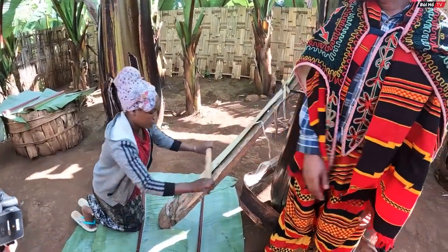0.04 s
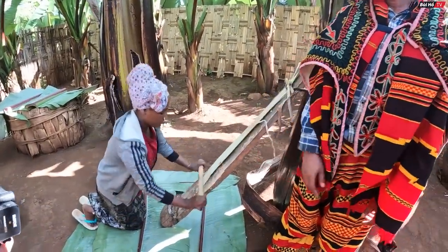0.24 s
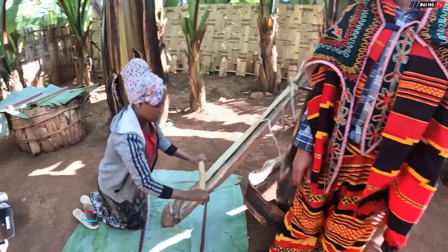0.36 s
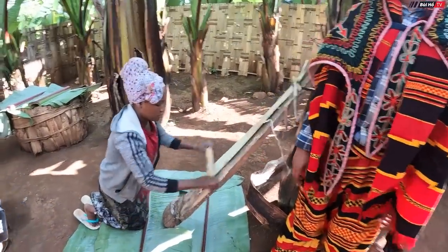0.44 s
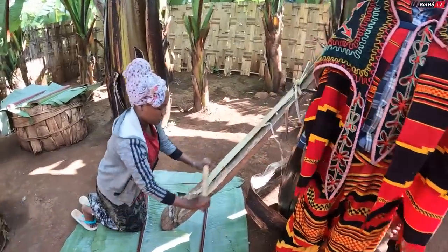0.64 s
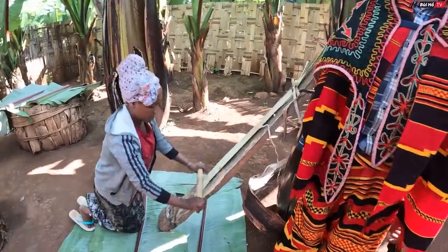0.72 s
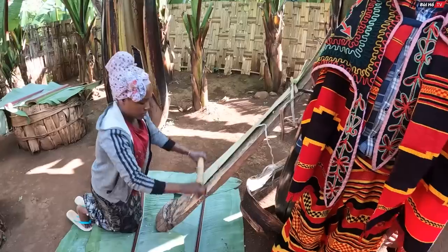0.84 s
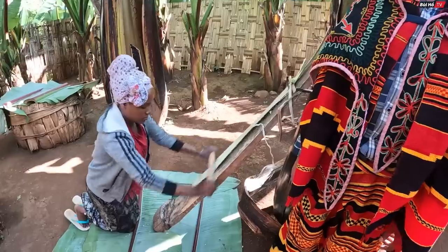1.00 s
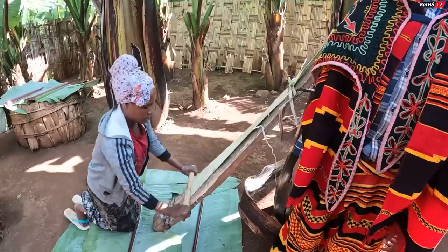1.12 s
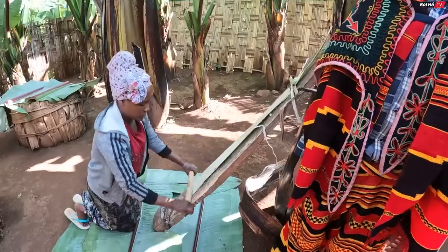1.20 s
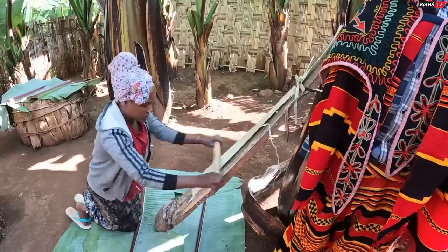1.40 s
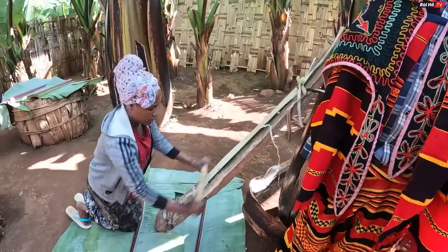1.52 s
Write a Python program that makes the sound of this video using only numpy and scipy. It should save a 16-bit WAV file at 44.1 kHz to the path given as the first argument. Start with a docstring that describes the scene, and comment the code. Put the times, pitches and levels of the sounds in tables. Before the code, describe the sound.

A bamboo blade scrapes a plant stem on a wooden board in three close, even strokes, with soft knocks and pulp rustling between them. Outdoors, wind bumps the microphone, and a distant rooster and small bird are faintly heard.

```python
"""Outdoors, a yard hums faintly, wind bumps the microphone and a far rooster holds the end of its crow. Right
at the start a cricket chirps, and pulp and leaves rustle. Then a bamboo blade scrapes pulp off a plant stem on
a wooden board: thousands of tiny fibre tears make a rasp and ring the blade and board. The cricket chirps
again, and two more strokes follow. Along the way pulp ticks, the blade rings briefly, the board knocks softly,
and pulp and leaves rustle between the strokes and after the last one."""
import sys
import numpy as np
from scipy import signal
from scipy.fft import rfft, irfft
from scipy.io import wavfile

SR = 44100
rng = np.random.default_rng(int(sys.argv[2]) if len(sys.argv) > 2 else 0)


def generate_wav(signal):
    """Clip the signal to [-1, 1] and save it as 16-bit WAV at the path in sys.argv[1]."""
    frames = np.transpose(np.atleast_2d(signal))
    scaled = np.clip(frames, -1, 1) * 32767
    pcm = np.round(scaled).astype(np.int16)
    wavfile.write(sys.argv[1], SR, pcm)


N = 68355
TIME = np.arange(N) / SR  # in seconds
FREQS = np.fft.rfftfreq(N, 1 / SR) + 1  # in Hz; the + 1 avoids the log of zero

# The tone of the yard's hum. Each row: frequency in Hz, relative level in dB.
YARD_SPECTRUM = [(100, -18), (170, -6.5), (240, -10.5), (330, -18), (600, -25.5), (1000, -21), (1500, -18),
                 (2200, -29), (5700, -28.5), (9000, -39), (12500, -45), (15500, -83)]
# The rise and fall of the wind. Each row: time in seconds, level in dB.
WIND_LEVELS = [(0, -47.5), (.17, -46), (.4, -48), (.64, -43.5), (.9, -51.5), (1.15, -56.5), (1.26, -48),
               (1.55, -52)]
# The tone of the wind's rumble. Each row: frequency in Hz, relative level in dB.
WIND_SPECTRUM = [(12, 9), (30, 0), (50, -16), (70, -14), (90, -50)]
# The rooster's note. Each row: time in seconds, pitch in Hz, level of the second harmonic in dB.
CROW_NOTE = [(0, 822, -72), (.55, 764, -64), (.6, 760, -74), (.645, 756, -64), (.9, 713, -64),
             (1.01, 704, -62), (1.1, 691, -70), (1.45, 664, -69), (1.49, 660, -63), (1.55, 656, -72)]
# The cricket's chirps. Each row: middle in seconds, half length in seconds, pitch in Hz, level in dB.
CRICKET_CHIRPS = [(0.006, 0.015, 5810, -61.5), (0.65, 0.035, 5920, -72)]
# Rustles of pulp and leaves. Each row: start in seconds, length in seconds, level in dB,
# centre in Hz, width to each side in octaves.
LEAF_RUSTLES = [(0.013, 0.039, -60.5, 4700, 1.4), (0.087, 0.01, -59.5, 3700, 1.7),
                (0.381, 0.013, -48.5, 3140, 0.89), (0.473, 0.051, -47.5, 1450, 2.3),
                (0.538, 0.04, -55, 1520, 1.5), (0.901, 0.072, -54.5, 3320, 1.75),
                (1.495, 0.04, -58, 1380, 1.2)]
# Single gusts. Each row: middle in seconds, peak level in dB, half length of the push in seconds.
GUSTS = [(0.207, -34.5, 0.0073), (0.275, -22.5, 0.0052), (0.319, -39, 0.0052), (0.798, -36, 0.0053)]
# The blade's strokes, one list each. Each row: time in seconds, level of the bright rasp in dB,
# then the low rasp, the blade's ring and the board's body, each in dB above that level.
STROKES = [
    [(.217, -54, -10, -12, -22), (.234, -43, -8, -7, -13), (.242, -29.5, -12, -5, -17.5),
     (.27, -26, -14, 5.5, -13.5), (.292, -27, -3, -15, -10.5), (.312, -28, -4.5, -6.5, -10),
     (.35, -35.5, -2, -7, -7), (.364, -46.5, -1, -1.5, -6), (.475, -67, -12, -13, -7)],
    [(.672, -67, -21, -10, -1), (.68, -47.5, -12, -11, -46), (.69, -37.5, -1, 0, -14),
     (.708, -31, -16, 0, -18), (.717, -26.5, -7.5, -4, -14.5), (.76, -28.5, -4, 4, -10),
     (.79, -31, -0.5, 0.5, -6), (.825, -40, -10.5, -2, -7.5), (.868, -60, 4.5, 0, -7),
     (.92, -65, -14, 3, -23)],
    [(1.108, -68, -18, -18, -31), (1.122, -34.5, -11.5, -3.5, -18), (1.148, -31.5, -9.5, -7, -12),
     (1.17, -28.5, -8.5, 1.5, -8.5), (1.206, -28, -3, 8, -6.5), (1.225, -29.5, -10, -2.5, -6.5),
     (1.255, -29.5, -4, -2.5, -10), (1.288, -47.5, -4, 2, 0), (1.34, -56, -5, 0.5, 0),
     (1.378, -53.5, -4, -14, 3.5), (1.39, -45, -20, 1, -26), (1.404, -62.5, -3, -5, 1),
     (1.46, -68, -5, 3, 1)],
]
# The tone of tearing fibres. Each row: frequency in Hz, relative level in dB.
RASP_SPECTRUM = [(1500, 1), (2500, 2.5), (3200, 5), (4000, 2.5), (5000, 2.5), (6500, -4.5), (8400, -12),
                 (10200, -12), (13000, -21), (15900, -46)]
# The tone of the wooden board. Each row: frequency in Hz, relative level in dB.
BOARD_SPECTRUM = [(110, -15), (221, -5), (471, -13), (567, -6.5), (732, -10.5), (973, -3), (1150, -1.5),
                  (1500, -37)]
# The ring of taut fibres. Each row: time in seconds, pitch in Hz, level in dB above the bright rasp.
FIBRE_GLIDE = [(.24, 3630, -11), (.3, 3427, -3), (.35, 2779, -9), (.69, 3920, -6.5), (.735, 3348, -3.5),
               (.755, 2687, -3), (.8, 2600, -4), (1.12, 4248, 3), (1.145, 4000, -5), (1.16, 3120, -1),
               (1.27, 2797, -19)]
# The blade's resonances. Each row: frequency in Hz, width in Hz, relative level in dB.
BLADE_RESONANCES = [(1278, 63, 7.5), (1399, 82, 10.5), (1684, 33, -0.5)]
# Snaps and ticks of pulp, and one brief ring of the blade (the row at 0.305 s). Each row: start in seconds,
# peak level in dB, centre in Hz, width in Hz.
TICK_SOUNDS = [(0.305, -22, 1670, 108), (0.471, -51, 10500, 3000), (0.539, -46, 1570, 300),
               (0.5565, -42, 2240, 900), (0.5583, -42.5, 5950, 5000), (0.563, -45.5, 1190, 300),
               (0.652, -52, 4160, 976), (0.9035, -52, 9500, 5000), (0.948, -58, 10500, 4000),
               (1.0707, -41.5, 5500, 2518), (1.2132, -10, 1250, 1000), (1.319, -46.5, 11000, 2500),
               (1.4375, -51, 12000, 2520), (1.449, -46, 2500, 2000), (1.4994, -43, 1850, 1200),
               (1.5116, -37.5, 1358, 700)]
# Soft knocks on the board. Each row: start in seconds, level in dB, pitch in Hz.
BOARD_KNOCKS = [(0.481, -47, 212), (0.691, -47, 190), (0.958, -44, 205), (0.999, -44.5, 210),
                (1.203, -34, 230), (1.252, -33, 246), (1.267, -35.5, 277)]
# How alike left and right are for close sounds. Each row: frequency in Hz, likeness from 0 to 1.
STEREO_LIKENESS = [(300, .93), (1300, .97), (2500, .88), (8000, .82), (13000, .25)]
# How much louder the left side is. Each row: frequency in Hz, left minus right in dB.
LEFT_LOUDER = [(60, -3), (1650, 1), (4970, 2.5), (15000, 4.5)]
# How far the left side runs ahead. Each row: frequency in Hz, phase in radians (negative is behind).
LEFT_AHEAD = [(2000, -.4), (8000, -.5)]


def amp(db):
    """Turns decibels into a factor to multiply by."""
    return 10 ** (np.asarray(db) / 20)


def rms_one(x):
    """Scales a sound to an average (rms) level of 1."""
    return x / np.sqrt(np.mean(x ** 2) + 1e-20)


def in_time(rows):
    """Joins a table's rows with straight lines in time, giving one curve for each later column."""
    times, *columns = np.transpose(rows)
    return [np.interp(TIME, times, column) for column in columns]


def over_frequency(rows):
    """Joins a table's rows with straight lines on a log frequency axis."""
    hz, values = np.transpose(rows)
    return np.interp(np.log(FREQS), np.log(hz), values)


def drift(hz):
    """A slow random wobble of size 1, moving mostly slower than hz."""
    r = np.exp(-2 * np.pi * hz / SR)
    wobble = signal.lfilter([1], [1, -2 * r, r * r], rng.standard_normal(N + 8000))
    return rms_one(wobble[8000:])  # skip the filter's settling


def colour(x, spectrum):
    """Gives a sound the tone of a spectrum, silent beyond its ends, at level 1."""
    inside = (FREQS > spectrum[0][0]) & (FREQS < spectrum[-1][0])
    return rms_one(irfft(rfft(x) * amp(over_frequency(spectrum)) * inside, N))


def resonate(x, hz, width_hz):
    """One resonance: the narrower it is, the longer it rings."""
    r = np.exp(-np.pi * width_hz / SR)
    return signal.lfilter([1 - r * r, 0, r * r - 1], [1, -2 * r * np.cos(2 * np.pi * hz / SR), r * r], x)


def stereo_noise(spectrum, likeness):
    """Noise that left and right partly share."""
    mid, side = colour(rng.standard_normal((2, N)), spectrum)
    return mid + np.sqrt((1 - likeness) / (1 + likeness)) * side * [[1], [-1]]


def yard():
    """The yard's faint hum is steady noise, strongest in the lows."""
    return amp(-60.5) * stereo_noise(YARD_SPECTRUM, likeness=0.54)


def wind():
    """Wind on the microphone makes a deep rumble that swells and sinks."""
    level_db, = in_time(WIND_LEVELS)
    return amp(level_db) * stereo_noise(WIND_SPECTRUM, likeness=0.4)


def rooster():
    """One long, wavering note sags in pitch. It is strongest in its second harmonic."""
    hz, db = in_time(CROW_NOTE)
    shaky_hz = hz * (1 + 0.003 * drift(hz=27))
    phase = 2 * np.pi * np.cumsum(shaky_hz) / SR
    note = np.sqrt(2) * (np.sin(2 * phase) + amp(-12) * np.sin(phase))
    waver_db = 3.5 * drift(hz=30)
    return note * amp(db + waver_db) * amp([[-3], [2.5]])  # off to the right


def cricket(width_hz=130):
    """A cricket's thin, breathy chirps far off: short swells of noise in a narrow band."""
    noise, out = rng.standard_normal((2, N)), 0
    for middle, half_length, hz, db in CRICKET_CHIRPS:
        whistle = resonate(resonate(noise, hz, width_hz), hz, width_hz)
        swell = np.exp(-((TIME - middle) / half_length) ** 4)
        out += amp(db) * rms_one(whistle) * swell
    return out


def tears(per_second=5000, spread_db=1.5):
    """Each tearing fibre is a tiny click of random size. Gives two unrelated streams of them."""
    sizes = amp(spread_db * np.minimum(rng.exponential(1, (2, N)), 5))
    signs = rng.choice([-1, 1], (2, N))
    tearing = rng.random((2, N)) < per_second / SR
    return rms_one(sizes * signs * tearing)


def rustles():
    """Pulp and leaves rustle in short swells of tiny tears, spread over a broad band."""
    grains, out = tears(), 0
    for start, length, db, hz, octaves in LEAF_RUSTLES:
        low_hz, high_hz = hz * 2 ** -octaves, min(hz * 2 ** octaves, 12000)
        band = [(60, -30), (low_hz, -6), (hz, 0), (high_hz, -14), (14000, -45)]
        progress = np.clip((TIME - start) / length, 0, 9)
        swell = np.minimum(progress * 6, 1) * np.exp(-progress ** 3)
        out += amp(db) * colour(grains, band) * swell
    return out


def gusts():
    """Each gust pushes the microphone's membrane out and lets it swing back."""
    out = 0
    for middle, db, half_length in GUSTS:
        offset = (TIME - middle) / half_length
        out += amp(db) * (1 - offset ** 2) * np.exp(-offset ** 2 / 2)
    return out * amp([[-1.5], [1.5]])  # a little to the right


def scrape(split_hz=2620):
    """The blade tears fibres, which make a bright and a low rasp and ring the blade and the board."""
    grains = tears()
    rasp = colour(grains, RASP_SPECTRUM)
    lows = signal.sosfiltfilt(signal.butter(2, split_hz, fs=SR, output="sos"), rasp)
    bright = rms_one(rasp - lows) + fibre_ring()
    low, blade, board = rms_one(lows), blade_ring(), colour(grains, BOARD_SPECTRUM)
    out = 0
    for stroke in STROKES:
        level_db, low_db, blade_db, board_db = in_time(stroke)
        touching = (TIME > stroke[0][0]) & (TIME < stroke[-1][0])
        mix = bright + amp(low_db) * low + amp(blade_db) * blade + amp(board_db) * board
        out += touching * amp(level_db) * mix
    return out


def fibre_ring(half_width_hz=130):
    """Tears ring the taut fibres at a pitch that sinks along each stroke."""
    hz, db = in_time(FIBRE_GLIDE)
    phase = 2 * np.pi * np.cumsum(hz) / SR
    smooth = signal.butter(2, half_width_hz, fs=SR, output="sos")
    # Two slow noises ride on a gliding tone and make a narrow band that follows the pitch.
    first, second = signal.sosfilt(smooth, tears()), signal.sosfilt(smooth, tears())
    return amp(db) * rms_one(first * np.cos(phase) + second * np.sin(phase))


def blade_ring(wander_db=1.2):
    """Tears ring the bamboo blade. Each resonance grows and fades as the contact moves."""
    shaking, out = resonate(tears(), hz=1344, width_hz=490), 0
    for k, (hz, width_hz, db) in enumerate(BLADE_RESONANCES):
        gain = amp(db + wander_db * drift(hz=12))
        out += (-1) ** k * gain * resonate(shaking, hz, width_hz)  # neighbours have opposite signs
    return rms_one(out)


def ticks(top_hz=12500):
    """Each snap of pulp, and the blade's one brief ring, is a single click that rings briefly in its own band."""
    soften, out = signal.butter(4, top_hz, fs=SR, output="sos"), 0
    for start, db, hz, width_hz in TICK_SOUNDS:
        spike = np.arange(N) == int(start * SR)
        click = signal.sosfilt(soften, spike + 1e-18)  # the tiny offset keeps the filters fast
        tick = resonate(resonate(click, hz, width_hz), hz, width_hz)
        out += amp(db) * tick / np.abs(tick).max()
    return out


def knocks(ring_seconds=0.05):
    """Each soft knock on the board is one low tone that quickly dies away."""
    out = 0
    for start, db, hz in BOARD_KNOCKS:
        age = np.maximum(TIME - start, 0)
        out += amp(db - 60 * age / ring_seconds) * np.sin(2 * np.pi * hz * age)
    return out


def place(pair):
    """Turns a shared and a differing sound into left and right, as two close microphones hear them."""
    likeness, lean_db = over_frequency(STEREO_LIKENESS), over_frequency(LEFT_LOUDER)
    mid, side = rfft(pair)
    side *= np.sqrt((1 - likeness) / (1 + likeness))
    left = (mid + side) * amp(lean_db / 2) * np.exp(1j * over_frequency(LEFT_AHEAD))
    right = (mid - side) * amp(-lean_db / 2)
    return irfft([left, right], N)


def scene():
    """Adds the close work on the board to the air, the far rooster and the cricket."""
    air = wind() + gusts() + yard()
    hits = (ticks() + knocks()) * [[1], [0]]  # only in the sound that both sides share
    work = place(scrape() + rustles() + hits)
    return air + work + rooster() + cricket()


def record(dry, cutoff_hz=15650):
    """Cuts off the very highest treble."""
    return signal.sosfilt(signal.cheby2(20, 70, cutoff_hz, fs=SR, output="sos"), dry)


dry = scene()
out = record(dry)
generate_wav(out)
```